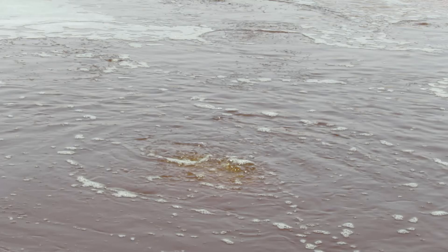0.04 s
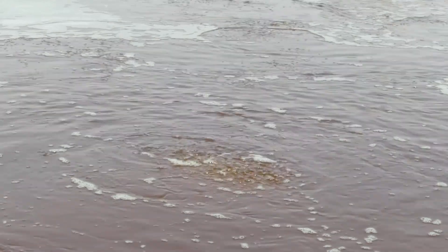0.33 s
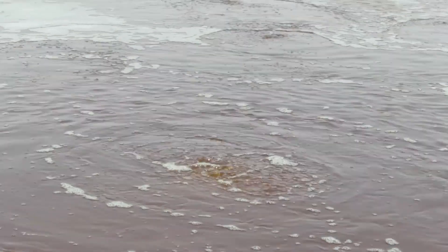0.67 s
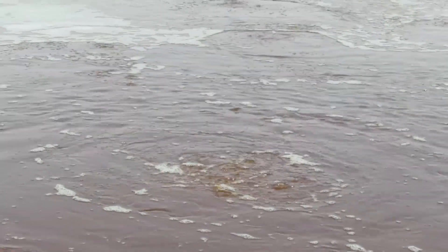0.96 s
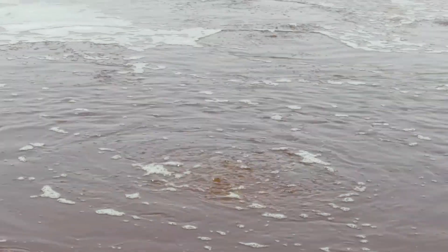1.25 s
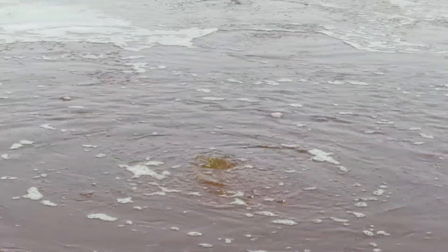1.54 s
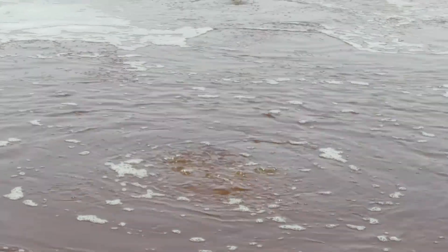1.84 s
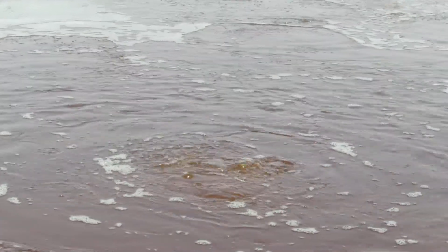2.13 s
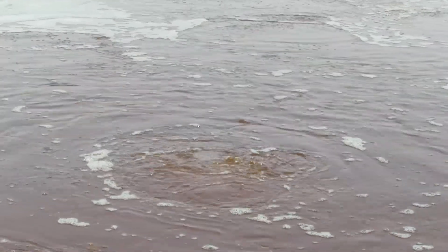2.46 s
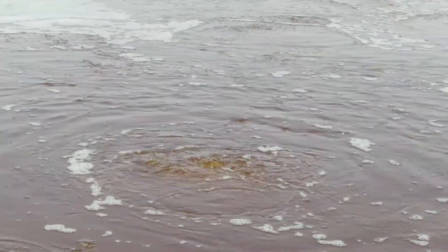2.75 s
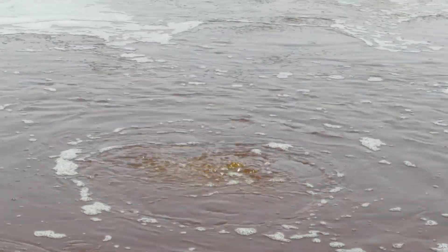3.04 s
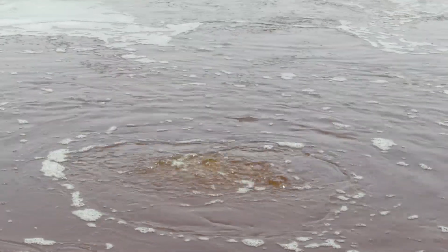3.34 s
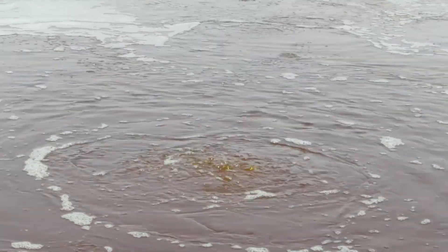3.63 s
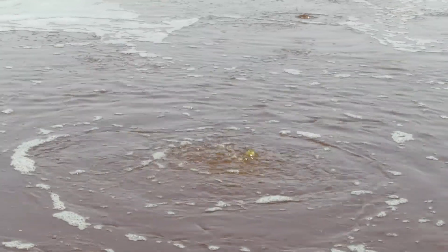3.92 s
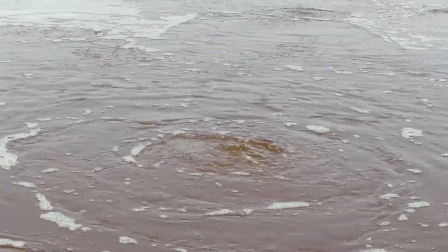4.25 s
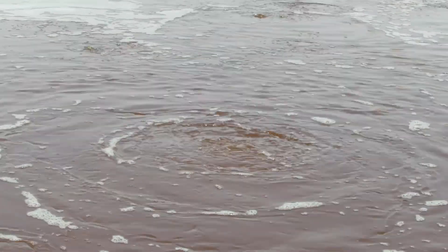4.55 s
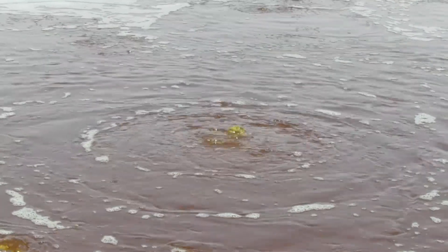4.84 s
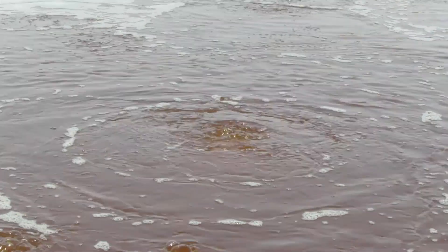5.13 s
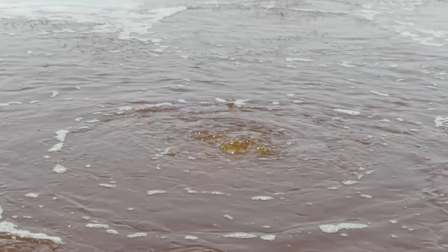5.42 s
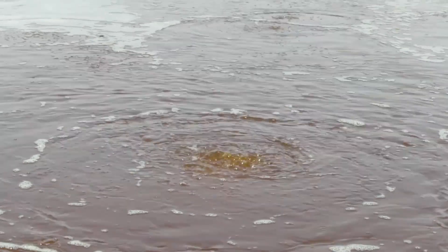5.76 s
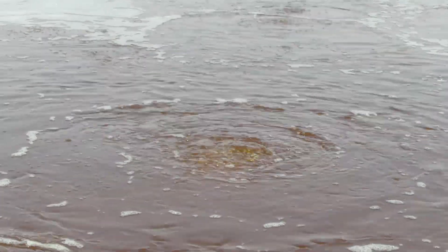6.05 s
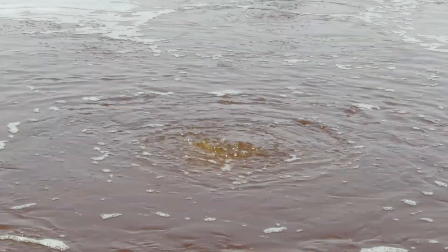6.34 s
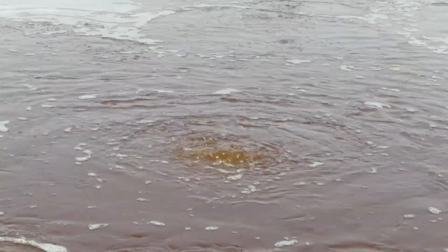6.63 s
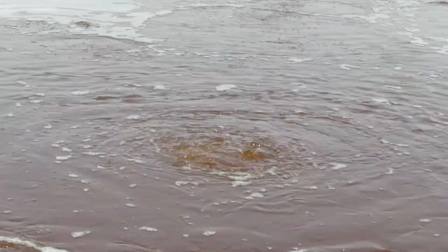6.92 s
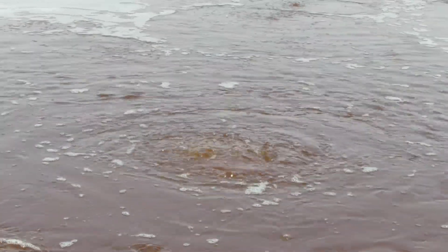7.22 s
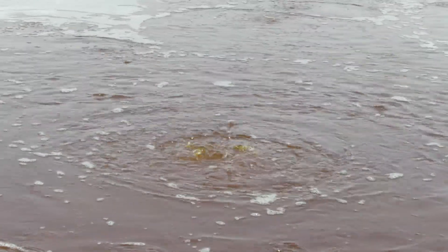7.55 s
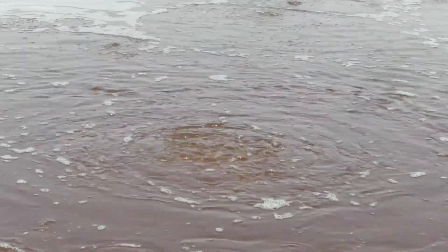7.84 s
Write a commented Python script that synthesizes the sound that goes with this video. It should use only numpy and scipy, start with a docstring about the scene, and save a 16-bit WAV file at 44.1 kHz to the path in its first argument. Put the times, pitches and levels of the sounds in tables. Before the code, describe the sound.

Water wells up in a shallow pool with steady gurgling, bloops and fine fizz, under gusty wind rumble on the microphone.

```python
"""A hot spring in a wide, shallow pool, heard from its edge in the open air on a two-port microphone.
From the start the upwelling churns and gurgles, and escaping gas fizzes all over the water.
Gusts buffet the ports almost at once; gas pockets boil up, and bubbles surface with bloops and plinks.
From about a second in, the hardest eddies thump enough to make the gain control duck the water.
Later foam snaps close by. Halfway the breeze dies down, and the last gusts and thumps are softer."""
import sys
import numpy as np
from scipy import signal
from scipy.fft import rfft, irfft
from scipy.io import wavfile
from scipy.ndimage import uniform_filter1d, map_coordinates

SR = 44100
rng = np.random.default_rng(int(sys.argv[2]) if len(sys.argv) > 2 else 0)


def transcribe(signal):
    """Save signal, clipped to [-1, 1], as a 16-bit WAV file at the path in sys.argv[1]."""
    frames = np.atleast_2d(signal).T
    limited = np.clip(frames, -1, 1)
    pcm = np.round(limited * 32767).astype(np.int16)
    wavfile.write(sys.argv[1], SR, pcm)


N = 351918
T = np.arange(N) / SR
BINS_HZ = np.fft.rfftfreq(N, 1 / SR)


def amp(db):
    """Decibels to gain."""
    return 10 ** (np.asarray(db) / 20)


def unit(x):
    """Scales to rms 1."""
    return x / np.sqrt(np.mean(x ** 2) + 1e-20)


def curve_at(points, hz):
    """Joins points by straight lines over log frequency."""
    points_hz, values = np.transpose(points)
    return np.interp(np.log(hz + 1), np.log(points_hz + 1), values)


def colour(x, spectrum):
    """Gives a sound the shape of a spectrum."""
    return irfft(rfft(x) * amp(curve_at(spectrum, BINS_HZ)), N)


def wander(rate_hz):
    """A smooth random drift of rms 1."""
    return unit(irfft(rfft(rng.standard_normal(N)) * np.exp(-(BINS_HZ / rate_hz) ** 2), N))


def add(mix, start_s, sound):
    """Mixes a sound in at start_s."""
    part = mix[..., max(round(start_s * SR), 0):][..., :sound.shape[-1]]
    part += sound[..., :part.shape[-1]]


def placed(sound, pan):
    """Sets a sound between left (-1) and right (1)."""
    return np.outer([1 - pan, 1 + pan], sound)


def bubble(length_s, start_hz, end_hz, peak_at):
    """A bubble rings ever higher as the water above it thins, until it breaks the surface."""
    progress = np.linspace(0, 1, max(round(length_s * SR), 8))
    skew = np.log(.5) / np.log(np.clip(peak_at, .1, .9))
    swell = abs(np.sin(np.pi * progress ** skew)) ** 1.4
    pitch_hz = start_hz * (end_hz / start_hz) ** progress
    return swell * np.sin(2 * np.pi * np.cumsum(pitch_hz) / SR)


# The upwelling's tone from the pool's edge: frequency_hz, level_db
WATER_SPECTRUM = [(30, -8.5), (70, 2.5), (150, 6.5), (280, -4), (400, 0), (540, -3.5), (820, -7),
                  (1020, -5.5), (1200, -11), (1550, -13), (2400, -20), (3100, -26.5), (3800, -36.5),
                  (6000, -41)]
# How alike the churn is in left and right: frequency_hz, correlation
CHURN_LIKENESS = [(100, 1), (300, 0.95), (640, 0.93), (1300, 0.64), (3100, 0.63), (5000, .1)]
def churn(level_db=-36.5, surge_db=1.5, surge_hz=9.9):
    """Countless blurred bubbles and ripples out in the pool, surging a little."""
    hz, _, bands = signal.stft(rng.standard_normal((2, N)), SR, nperseg=512, noverlap=384)
    likeness = np.clip(curve_at(CHURN_LIKENESS, hz), -1, 1)[:, None]
    bands[1] = likeness * bands[0] + np.sqrt(1 - likeness ** 2) * bands[1]
    noise = signal.istft(bands, nperseg=512, noverlap=384)[1][:, :N]
    water = colour(noise, WATER_SPECTRUM) * amp(surge_db * wander(surge_hz))
    return amp(level_db) * unit(water)


def gurgle(level_db=-40, per_s=340, length_at_1khz_s=0.027, rise=0.723, spread_db=1.53, width=0.8):
    """A crowd of lesser bubbles, near and far: small ones ring higher and are gone sooner."""
    out, candidates = np.zeros((2, N)), 5000
    for when, smallness, life, lift, pan, distance, chance in rng.random((candidates, 7)):
        if chance < per_s * T[-1] / candidates:
            hz = 240 * (3200 / 240) ** smallness
            length_s = length_at_1khz_s * (.5 + life) * np.sqrt(1000 / hz)
            ring = np.sqrt(hz) * bubble(length_s, hz, hz * np.exp(rise * lift), peak_at=0.084)
            nearness = min(-np.log(distance), 3.6)
            add(out, when * T[-1], placed(amp(spread_db * nearness) * ring, width * (2 * pan - 1)))
    return amp(level_db) * unit(colour(out, WATER_SPECTRUM))


# The tone of gas escaping across the surface: frequency_hz, level_db
FIZZ_SPECTRUM = [(1500, -2), (3000, -27), (3800, -17), (4500, -7), (5500, -3), (7000, -1.5), (10200, -3),
                 (11300, -8.5), (13000, -8), (14500, -14.5), (15700, -22)]
def fizz(hiss_db=-50.5, pops_db=-58.5, per_s=1500, spread_db=2.0, decay_cycles=4.7, pitches=20):
    """Tiny gas bubbles burst all over the pool: near ones tick, far ones merge into hiss."""
    pops, t = np.zeros((2, N)), T[:500]
    for hz in np.geomspace(2200, 14500, pitches):
        nearness = np.minimum(rng.exponential(1, N), 4.5)
        bursts = amp(spread_db * nearness) * (rng.random(N) < per_s / pitches / SR)
        ring = hz * np.exp(-t * hz / decay_cycles) * np.sin(2 * np.pi * hz * t)
        ticks = signal.oaconvolve(bursts, ring)[:N]
        pops += [ticks, np.roll(ticks, rng.integers(-12, 13))]  # direction sets the delay between ports
    hiss = unit(colour(rng.standard_normal((2, N)), FIZZ_SPECTRUM))
    return amp(hiss_db) * hiss + amp(pops_db) * unit(colour(pops, FIZZ_SPECTRUM))


def spatter(level_db=-59, per_s=45, decay_s=0.0028):
    """Bursting foam throws fine spray: sudden little spits that die away."""
    hits = rng.random(N) ** 2 * (rng.random(N) < per_s / SR)
    envelope = signal.lfilter([1], [1, -np.exp(-1 / (decay_s * SR))], hits)
    return amp(level_db) * unit(colour(envelope * rng.standard_normal((2, N)), FIZZ_SPECTRUM))


def port_shares(side):
    """How the wind's pressure divides between the left port (0) and the right (1)."""
    angle = np.pi / 2 * np.clip(side, 0, 1)
    return np.array([[np.cos(angle)], [np.sin(angle)]])


# The breeze at the pool's edge: time_s, level_db
BREEZE_LEVELS = [(0, -28), (3.9, -26), (4.3, -37.5), (7.9, -36.5)]
# Gusts on the microphone: start_s, hold_s, level_db, side (0 left, 1 right)
MIC_GUSTS = [(0.086, 0.14, -19.5, 0.37), (0.28, 0.23, -18, 0.21), (0.551, 0.2, -14.5, 0.16),
             (0.792, 0.12, -20.5, 0.14), (0.952, 0.068, -12.5, 0.15), (1.073, 0.45, -18.5, 0.065),
             (1.625, 0.31, -14.5, 0.048), (2.072, 0.048, -16.5, 0.54), (2.274, 0.15, -17.5, 0.049),
             (2.534, 0.089, -18, 0.15), (2.777, 0.18, -16, 0.29), (3.028, 0.074, -8.5, 0.55),
             (3.195, 0.047, -13.5, 0.6), (3.27, 0.053, -17, 0.17), (3.418, 0.087, -13, 0.63),
             (3.641, 0.19, -12, 0.13), (3.864, 0.1, -17, 0.073), (4.54, 0.13, -18, 0.16),
             (4.731, 0.09, -14, 0.43), (4.871, .13, -21.5, 0.42), (5.293, 0.082, -12, 0.57),
             (5.514, 0.17, -17.5, 0.17), (5.807, 0.26, -17.5, 0.67), (7.194, 0.41, -23.5, 0.17)]
def wind_force(breeze_side=0.27, rise_s=0.02687, fall_s=0.029):
    """The wind's strength at each port in dB: every gust rises, holds and falls on top of the breeze."""
    breeze_db = np.interp(T, *np.transpose(BREEZE_LEVELS))
    power = (port_shares(breeze_side) * amp(breeze_db)) ** 2
    for start_s, hold_s, level_db, side in MIC_GUSTS:
        fade = np.maximum(start_s - T, 0) / rise_s + np.maximum(T - start_s - hold_s, 0) / fall_s
        power += (port_shares(side) * amp(level_db) * np.maximum(1 - fade, 0)) ** 2
    return 10 * np.log10(power)


# Rumble right at a port, for eddies passing at speed 1: frequency_hz, level_db
EDDY_SPECTRUM = [(15, -44), (35, -34), (55, -16.5), (75, 2.5), (105, 0), (160, -5.5), (280, -16.5),
                 (450, -35.5), (800, -53), (2000, -90)]
def buffet(wind_db, pace, gain_db, quickening=.1, quicken_above_db=-19, lumpy_db=3.5):
    """Eddies pass one port in lumps: the harder it blows, the faster they go and the higher the rumble."""
    force_db = wind_db + lumpy_db * np.tanh(wander(rate_hz=24.45))
    speed = pace * amp(quickening * np.maximum(force_db - quicken_above_db, 0))
    eddies = colour(rng.standard_normal(N), EDDY_SPECTRUM)
    eddies /= np.sqrt(uniform_filter1d(eddies ** 2, size=2600))  # evened out, so the gust sets the level
    rumble = map_coordinates(eddies, [np.cumsum(speed) % (N - 1)], order=3, mode="wrap")
    return amp(force_db + gain_db) * rumble


def thump(t, hz, wake_gain=0.55, wake_s=0.01, wake_ratio=0.663, softness=7):
    """A vortex passes: one sharp suction between two soft pushes, then a slower, dying wake."""
    phase, after_s = np.pi * hz * t, np.maximum(t, 0)
    core = ((2 + 1 / softness) * phase ** 2 - 1) / (1 + phase ** 2 / softness) ** (softness + 2)
    wake = np.exp(-after_s / wake_s) * np.sin(2 * np.pi * wake_ratio * hz * after_s)
    return core + wake_gain * wake


# Single hard eddies striking the microphone: time_s, level_db, pitch_hz, port (0 left, 1 right)
HARD_EDDIES = [(0.162, -7.5, 175, 0), (0.596, -7, 202, 0), (0.993, -1, 140, 0), (1.01, 1.04, 245, 0),
               (1.878, -9, 162, 0), (2.094, 0.4, 223, 1), (2.194, -3.5, 103, 0), (2.307, -2, 115, 0),
               (2.411, 0, 134, 0), (2.582, 1.04, 135, 0), (2.609, -4.5, 145, 0), (2.853, -5, 250, 0),
               (2.98, 1, 195.4, 0), (3.034, 1, 272, 1), (3.049, 1.5, 228, 1), (3.139, 2, 170, 1),
               (3.207, 2, 186.5, 1), (3.303, -6, 228, 1), (3.443, -1, 150, 1), (3.625, -4, 249, 1),
               (3.745, -1.5, 210, 0), (3.782, 0, 126, 0), (3.793, -0.5, 240, 0), (3.824, 2.5, 114, 0),
               (4.146, 0.56, 265, 1), (4.19, -8, 169.7, 1), (4.918, -1.5, 214, 1), (5.289, 2, 175.7, 1),
               (5.351, -0.5, 187, 1), (5.835, -2, 204, 1), (5.863, -4, 275, 1), (5.883, -2.5, 197.2, 1),
               (5.949, -8, 235, 1), (6, -4.5, 198.5, 1), (6.947, -13, 125, 0), (7.296, -10.5, 169.6, 0),
               (7.411, -11, 116.8, 0), (7.766, -9.5, 103, 0)]
def wind(bleed=0.51, bleed_hz=1100, core_s=0.0032):
    """Each port has its own turbulence, which also shows inverted and duller in the other channel."""
    left_db, right_db = wind_force()
    ports = np.array([buffet(left_db, pace=.88, gain_db=2.26), buffet(right_db, pace=1.25, gain_db=2.0)])
    t = np.arange(-SR // 50, SR // 20) / SR
    for time_s, level_db, hz, port in HARD_EDDIES:
        ports *= 1 - np.exp(-((T - time_s) / core_s) ** 2)  # a hard eddy sweeps the small ones aside
        add(ports[int(port)], time_s + t[0], amp(level_db) * thump(t, hz))
    pole = np.exp(-2 * np.pi * bleed_hz / SR)
    return ports - bleed * signal.lfilter([1 - pole], [1, -pole], ports[::-1])


# Gas pockets breaking up in the pool: start_s, length_s, typical_hz, typical_bubble_db
GAS_POCKETS = [(0.423, 0.21, 816, -50), (2.002, 0.09, 772, -40), (2.366, .22, 830, -44),
               (3.024, 0.22, 616, -38.5), (3.662, 0.13, 1100, -44), (4.898, .28, 987, -41.5),
               (5.825, 0.22, 1590, -41.5), (7.579, 0.15, 992, -47.5)]
def boils(cycles=12, spread_octaves=1.29, rise=0.33, width=0.56, count=44):
    """A pocket of gas breaks into a knot of short, rising bubbles of similar size."""
    out = np.zeros((2, N))
    for start_s, length_s, typical_hz, bubble_db in GAS_POCKETS:
        for when, smallness, lift, pan in rng.random((count, 4)):
            hz = typical_hz * 2 ** (spread_octaves * (smallness - .5))
            ring = bubble(cycles / hz, hz, hz * np.exp(rise * lift), peak_at=0.067)
            gain = amp(bubble_db) * np.sqrt(typical_hz / hz)
            add(out, start_s + when * length_s, placed(gain * ring, width * (2 * pan - 1)))
    return out


# Large bubbles at the centre of the spring: start_s, start_hz, end_hz, level_db
LARGE_BUBBLES = [(0.471, 540, 1120, -36), (1.785, 440, 980, -29.5), (1.816, 780, 3000, -25.5),
                 (1.874, 1200, 2750, -42), (2.002, 1250, 3000, -41), (2.027, 580, 1100, -35),
                 (2.367, 620, 1000, -32.5), (2.452, 560, 1030, -33), (2.552, 430, 1200, -34),
                 (3.255, 500, 900, -34), (3.496, 860, 2800, -40), (3.692, 850, 2900, -36.5),
                 (4.488, 580, 1100, -36), (4.993, 480, 1150, -32.5), (5.285, 790, 2200, -34),
                 (5.968, 1050, 2500, -39), (6.404, 320, 460, -29), (6.452, 740, 1350, -35.5),
                 (6.826, 540, 740, -28.5), (6.874, 860, 1400, -36.5), (7.112, 720, 1800, -35),
                 (7.605, 650, 1150, -33.5)]
def bloops(width=0.57, shiver_hz=170, octaves_per_s_at_1khz=28, blur_hz=380):
    """Large bubbles glide upward: high ones glide faster, low ones are blurred by the heaving surface."""
    out, shiver = np.zeros((2, N)), wander(shiver_hz)
    for start_s, start_hz, end_hz, level_db in LARGE_BUBBLES:
        middle_hz = np.sqrt(start_hz * end_hz)
        length_s = np.log2(end_hz / start_hz) / (octaves_per_s_at_1khz * np.sqrt(middle_hz / 1000))
        ring = bubble(length_s, start_hz, end_hz, peak_at=0.51)
        blur = min((blur_hz / middle_hz) ** 2, np.sqrt(.5))
        ring *= np.sqrt(1 - blur ** 2) + blur * shiver[round(start_s * SR):][:len(ring)]
        add(out, start_s, placed(amp(level_db) * ring, width * rng.uniform(-1, 1)))
    return out


# Small single bubbles in front of the microphone: start_s, pitch_hz, level_db
SMALL_BUBBLES = [(1.207, 2390, -36), (1.587, 1100, -28.5), (3.039, 2345, -39), (3.521, 2590, -40),
                 (3.729, 2560, -39), (3.77, 1596, -35), (4.615, 5600, -48.5), (5.172, 2423, -38.5),
                 (5.643, 5440, -47), (7.043, 1038, -34)]
def plinks(length_s=0.012, width=0.34):
    """Small bubbles pinch off and ring briefly without gliding."""
    out = np.zeros((2, N))
    for start_s, hz, level_db in SMALL_BUBBLES:
        ring = bubble(length_s, hz, hz, peak_at=0.14)
        add(out, start_s, placed(amp(level_db) * ring, width * rng.uniform(-1, 1)))
    return out


# Foam domes close to the microphone: start_s, level_db, pitch_hz
FOAM_DOMES = [(2.772, -29, 8760), (3.848, -32, 8516), (4.803, -30, 10070), (4.898, -28, 2800),
              (5.873, -31, 10380), (6.048, -32, 2300), (6.215, -31, 10000), (6.728, -33, 2350),
              (7.554, -29.5, 7240)]
def snaps(decay_s=0.002, width_hz=2700):
    """A dome's film tears: a sudden spit of noise around one pitch."""
    out, t = np.zeros((2, N)), T[:512]
    bins_hz = np.fft.rfftfreq(len(t), 1 / SR)
    for start_s, level_db, hz in FOAM_DOMES:
        band = np.exp(-((bins_hz - hz) / width_hz) ** 2)
        spit = unit(irfft(rfft(rng.standard_normal((2, len(t)))) * band))
        add(out, start_s, amp(level_db) / 2 * spit * np.exp(-t / decay_s))
    return out


def scene():
    """The pool's edge in the open air: water and wind, with no echo."""
    return bloops() + plinks() + boils() + gurgle() + churn() + fizz() + spatter() + snaps() + wind()


def gain_control(x, trip_db=0.29, settle_db=-5.0, attack_s=0.00057, recovery_db_per_s=4.5):
    """A peak just over full scale turns everything down at once; the water then creeps back up."""
    peak_db = 20 * np.log10(abs(x).max(0) + 1e-9)
    cut_db = np.where(peak_db > trip_db, peak_db - settle_db, 0)
    held_db = np.maximum.accumulate(cut_db + recovery_db_per_s * T) - recovery_db_per_s * T
    pole = np.exp(-1 / (attack_s * SR))
    return x * amp(-signal.lfilter([1 - pole], [1, -pole], held_db))


def record(dry):
    """The microphone opens after a moment, ducks under thumps, rounds off peaks and cuts the top treble."""
    opening = amp(np.interp(T, [.07, .078, .1], [-60, -8, 0]))
    ducked = gain_control(dry * opening)
    rounded = ducked / (1 + ducked ** 8) ** (1 / 8)
    low_pass = signal.firwin(801, cutoff=15750, window=("kaiser", 9), fs=SR)
    return signal.oaconvolve(rounded, low_pass[None], "same")


dry = scene()
out = record(dry)
transcribe(out)
```